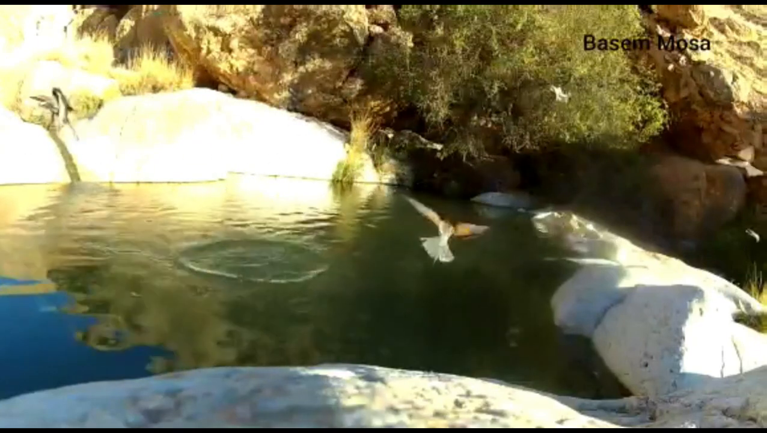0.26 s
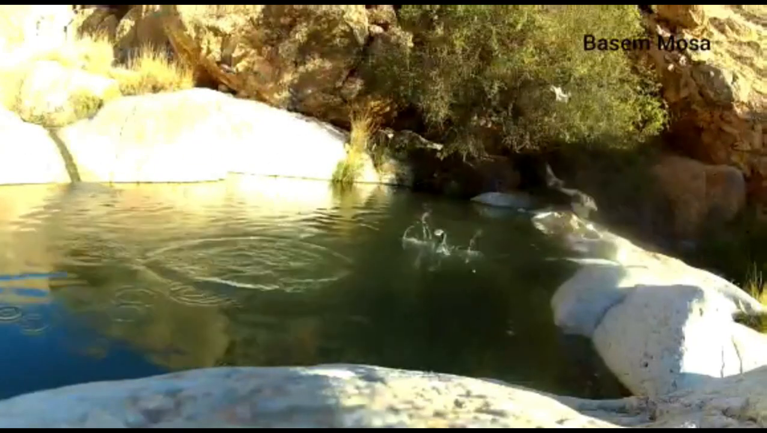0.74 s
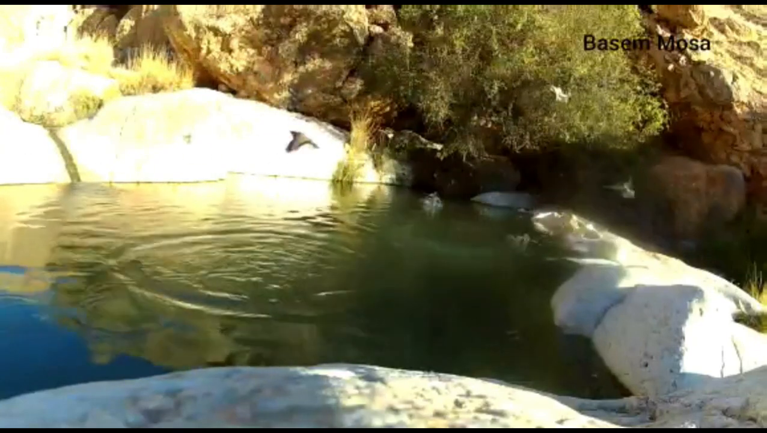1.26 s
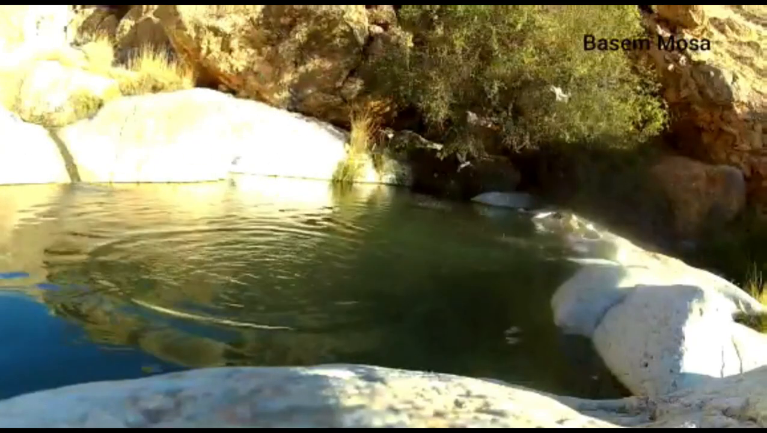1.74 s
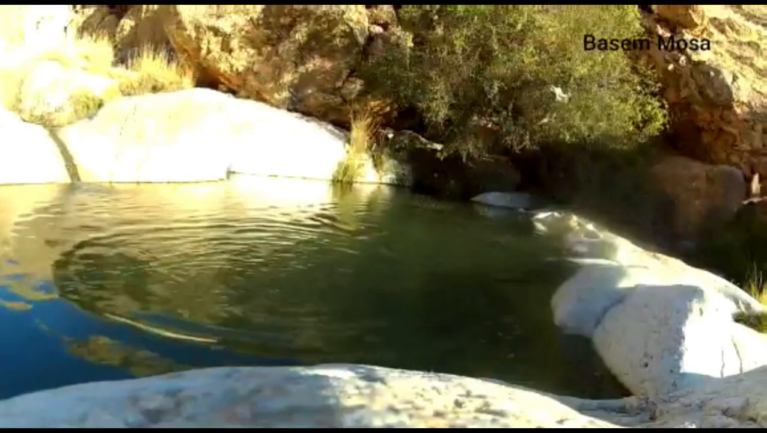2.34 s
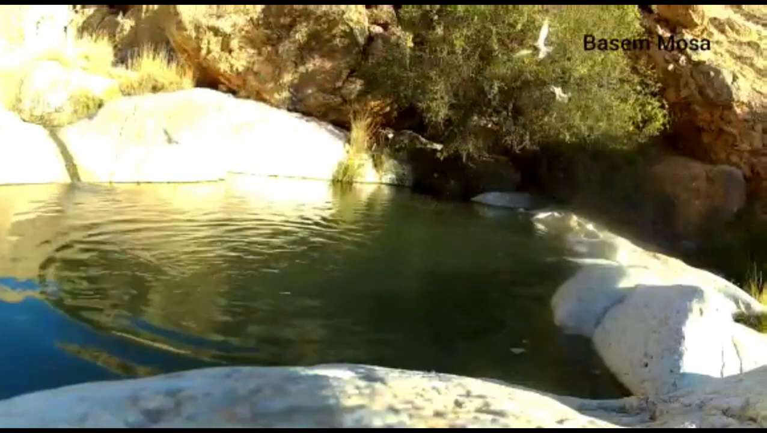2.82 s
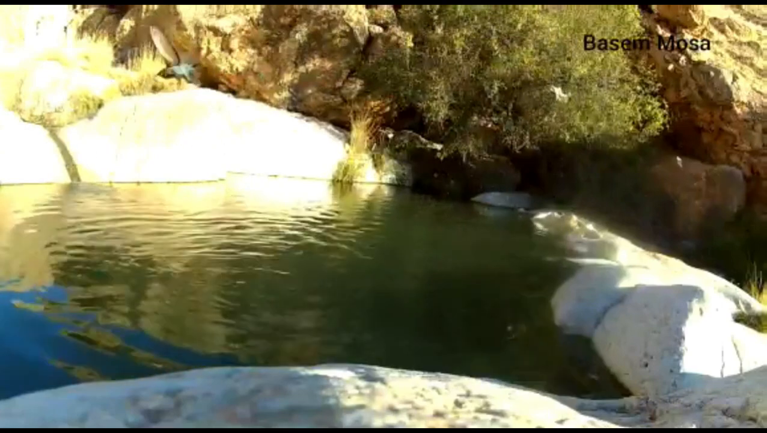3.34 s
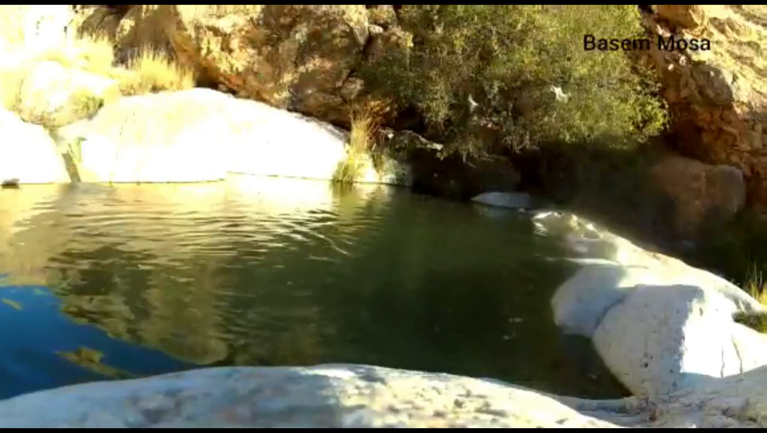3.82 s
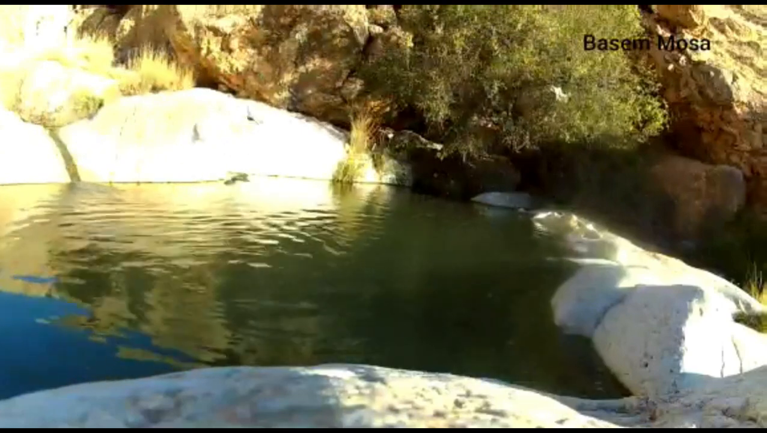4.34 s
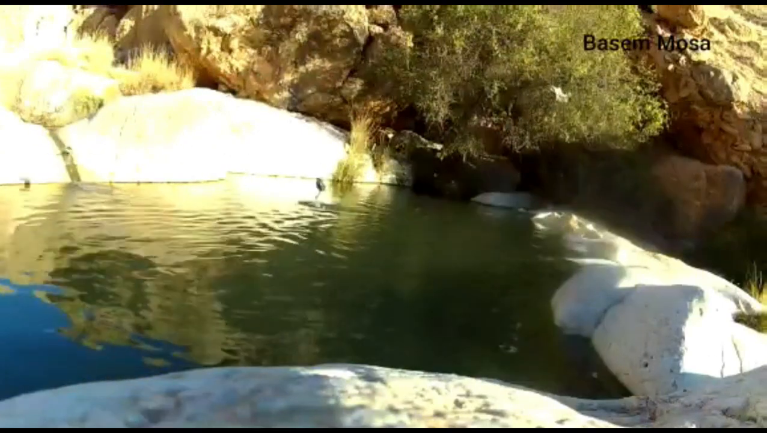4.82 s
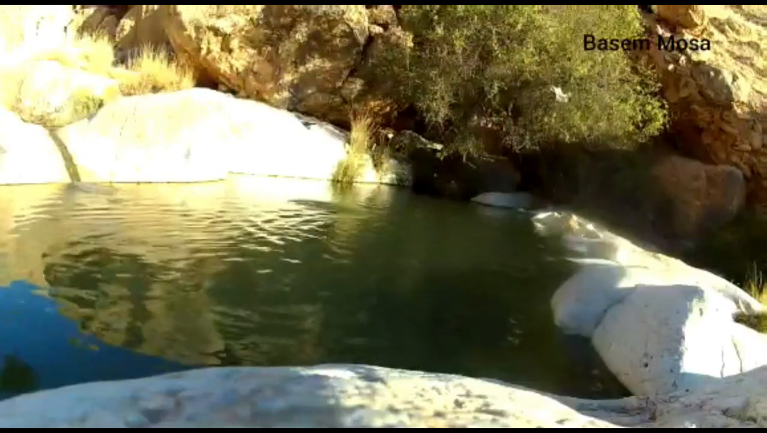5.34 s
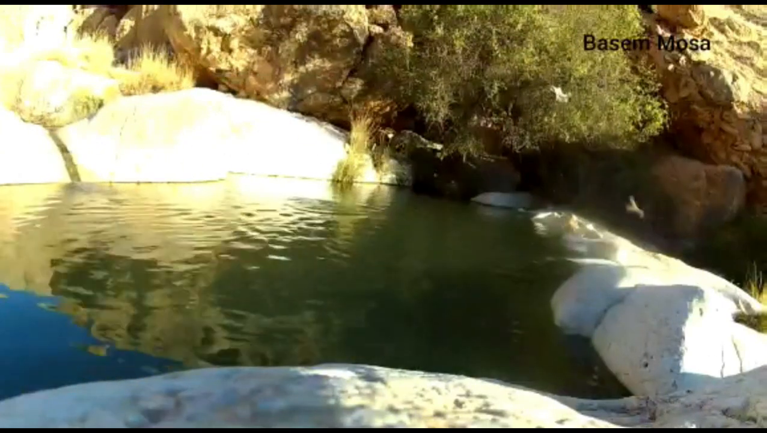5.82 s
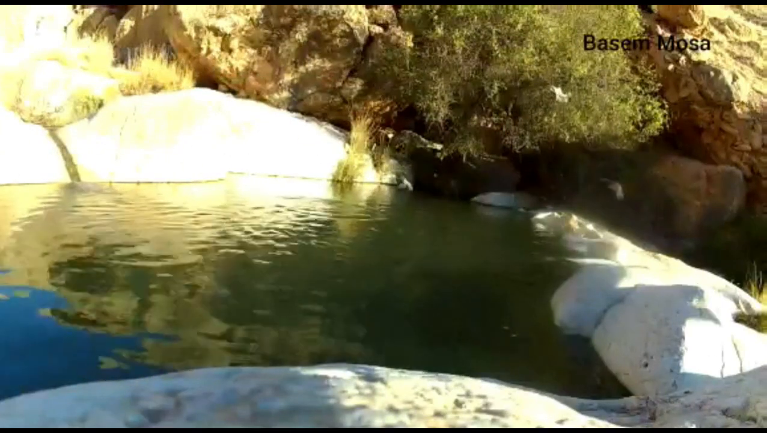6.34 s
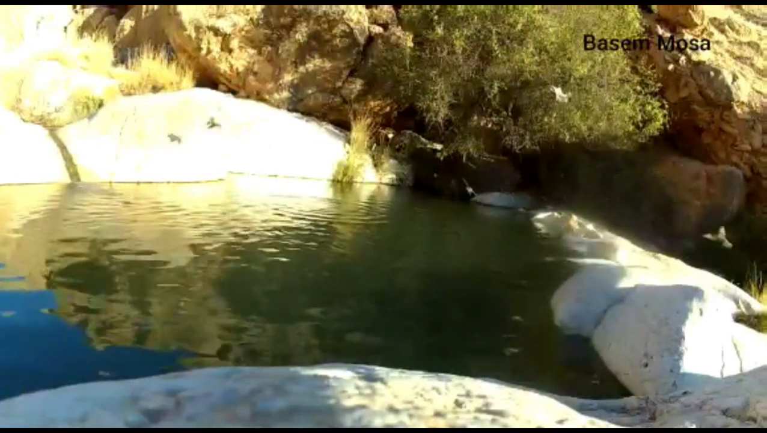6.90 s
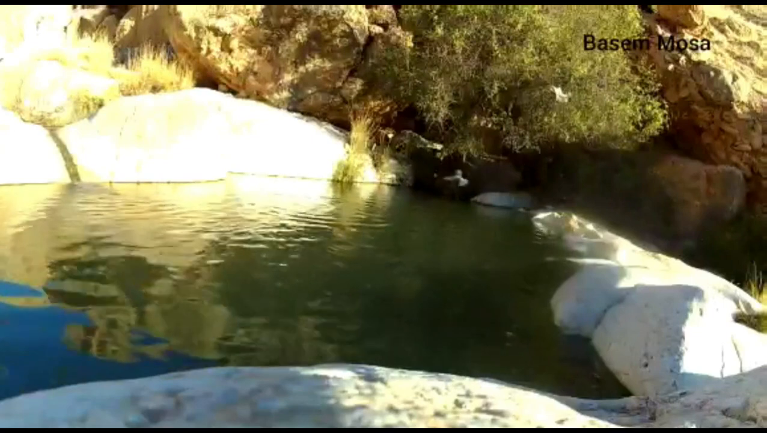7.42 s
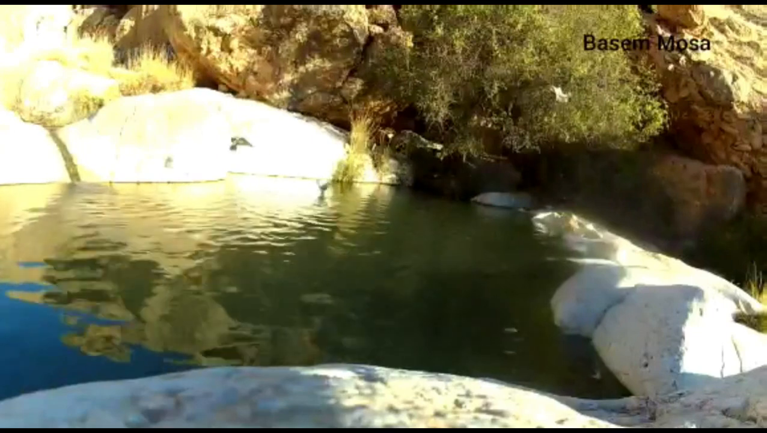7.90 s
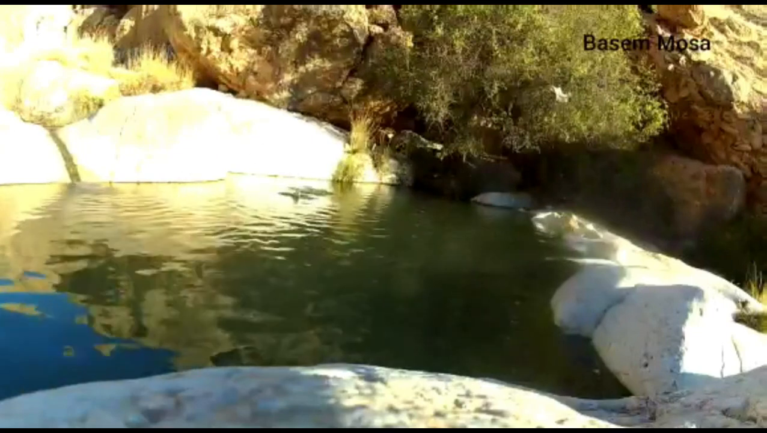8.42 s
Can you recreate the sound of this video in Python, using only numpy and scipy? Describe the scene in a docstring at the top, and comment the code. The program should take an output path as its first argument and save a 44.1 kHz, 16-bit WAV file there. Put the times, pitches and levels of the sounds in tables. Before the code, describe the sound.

Outdoors at a rock-walled pool, a steady hiss and low restless rumble run throughout. Small water plops and sharp clicky drips come early, then two quick rolling bird whistles, and another a second later. Faint trills follow from farther off, with scattered bubbles. A sudden, very close, loud rolling whistle stands out past the middle, then a short chip and distant trills. Mono, with rocky echoes and slightly dull top end.

```python
"""Bee-eaters over a rock pool

Bee-eaters dip into the pool and call in flight: rolling whistles (gliding tones with overtones), one of
them very near, a short chip, and far trills whose pitch beats evenly. The rock walls answer each call with
scattered noise. Spray is a patter of filtered clicks, plops and lapping are short ringing bubbles, and
filtered noise makes the low rumble and the steady hiss of air under it all."""
import sys
import numpy as np
from scipy import signal
from scipy.fft import rfft, irfft, next_fast_len
from scipy.io import wavfile
from scipy.ndimage import uniform_filter1d, map_coordinates

SR = 44100
rng = np.random.default_rng(int(sys.argv[2]) if len(sys.argv) > 2 else 0)


def materialize(psi):
    """Save the field psi as 16-bit PCM at rate SR to the path in sys.argv[1].

    A 1-D psi becomes a single channel; in a 2-D psi each row is a channel.
    """
    bounded = np.clip(np.atleast_2d(psi).T, -1, 1)
    quanta = np.round(bounded * 32767).astype(np.int16)
    wavfile.write(sys.argv[1], SR, quanta)


N = 381906
T = np.arange(N) / SR


def amp(db):
    """Decibels to gain."""
    return 10 ** (np.asarray(db) / 20)


def unit(x):
    """Scale to rms 1."""
    return x / np.sqrt(np.mean(x ** 2) + 1e-20)


def along(points, hz):
    """Read (Hz, value) points on a log axis."""
    f, v = np.transpose(points)
    return np.interp(np.log(hz + 1), np.log(f + 1), v)


def curves(rows, at):
    """Each column after the first, read at the given places."""
    s, *cols = np.transpose(rows)
    return [np.interp(at, s, c) for c in cols]


def wobble(rate, size):
    """A smooth random curve, rate knots a second."""
    knots = rng.standard_normal(int(size * rate / SR) + 4)
    return map_coordinates(knots, [np.arange(size) * rate / SR])


def filtered(x, response):
    """x times a gain that depends on frequency."""
    m = next_fast_len(N + SR // 2)
    return irfft(rfft(x, m) * response(np.fft.rfftfreq(m, 1 / SR)), m)[:N]


def phase_of(hz):
    """Running phase of a gliding tone."""
    return 2 * np.pi * np.cumsum(hz) / SR


def add(track, s, sound):
    """Mix a sound into the track at time s."""
    part = track[round(s * SR):][:len(sound)]
    part += sound[:len(part)]


def patchy_noise(patchy_db):
    """White noise whose strength drifts in small patches of time and frequency."""
    z = signal.stft(rng.standard_normal(N), nperseg=512)[2]
    field = uniform_filter1d(rng.standard_normal(z.shape), size=7, axis=0)
    field = uniform_filter1d(field, size=9, axis=1)
    return signal.istft(z * amp(patchy_db * unit(field)), nperseg=512)[1][:N]


def rocks(sound, echo_db, gap_s=0.0041, near_t60_s=0.27, far_t60_s=0.67, far_db=-17):
    """The direct sound, then dense scatter from the near rocks and a longer tail from the gorge."""
    # what the rocks send back: hz, gain_db
    echo_colour = [(1400, 4), (2000, 5.5), (2400, 8.5), (2700, 11.5), (3200, 3), (6000, -9.5),
                   (12000, -11.5)]
    t = np.arange(SR // 2) / SR
    near = amp(-60 * t / near_t60_s)
    far = amp(far_db - 60 * t / far_t60_s)
    decay = (t > gap_s) * (near + far)
    colour = amp(along(echo_colour, np.fft.rfftfreq(len(t), 1 / SR)))
    scatter = irfft(rfft(rng.standard_normal(len(t))) * colour, len(t))
    echo = signal.fftconvolve(sound, decay * scatter)
    # echo_db compares the energy of the whole echo with that of the direct sound
    echo *= amp(echo_db) * np.linalg.norm(sound) / np.linalg.norm(echo)
    add(echo, 0, sound)
    return echo


def air(split_hz=700, flutter_db=1.03, rumble_gain_db=4, hiss_db=-45, hiss_waver_db=0.4):
    """A low restless rumble, an even hiss and a few faint steady tones."""
    # spectrum of the air, before each half is scaled to rms 1: hz, relative_db_per_hz
    air_colour = [(12, -29.5), (20, -1.5), (65, 0.5), (116, -2.5), (220, -2), (430, -4.5), (568, -3.5),
                  (817, -5.5), (1110, -2.5), (1590, -7), (1830, -5), (3390, -17), (4000, -18), (6080, -24),
                  (15700, -30)]
    # bands where the hiss is a little stronger: middle_hz, width_hz, boost_db
    hiss_bands = [(4050, 160, 2), (11100, 450, 2), (13620, 170, 4), (15400, 500, 3.5)]
    # course of the rumble, before rumble_gain_db: time_s, level_db
    breeze = [(0.0, -52), (0.29, -50.5), (1.61, -51), (4.36, -53.5), (5.57, -51.5), (5.76, -53),
              (6.42, -51.5), (6.75, -53.5), (7.04, -52.5), (7.96, -53), (8.22, -52.5), (8.66, -50.5)]
    # faint steady tones: pitch_hz, level_db
    whine = [(60, -66), (10020, -81)]

    def colour(hz):
        boost = sum(db * np.exp(-((hz - middle) / width) ** 2) for middle, width, db in hiss_bands)
        return amp(along(air_colour, hz) + boost)

    rumble = unit(filtered(rng.standard_normal(N), lambda hz: colour(hz) * (hz < split_hz)))
    hiss = unit(filtered(patchy_noise(patchy_db=1.57), lambda hz: colour(hz) * (hz >= split_hz)))
    tones = np.zeros(N)
    for hz, db in whine:
        tones += amp(db) * np.sqrt(2) * np.sin(2 * np.pi * hz * T + 0.5 * wobble(4.1, N))
    rumble_db = curves(breeze, T)[0] + rumble_gain_db + flutter_db * wobble(14, N)
    hiss_course_db = hiss_db + hiss_waver_db * wobble(10, N)
    return amp(rumble_db) * rumble + amp(hiss_course_db) * hiss + tones


def lapping(count=320, middle_hz=290, spread=0.32, cycles=4, scatter_db=4):
    """Ripples from the dips gurgle against the rocks: low bubbles of a few cycles each."""
    # strength of the lapping: time_s, level_db
    lapping_level = [(0, -54), (.8, -53.5), (1.9, -49), (2.6, -62.5), (5.3, -54), (8.1, -68), (8.4, -47),
                     (8.66, -60)]
    out = np.zeros(N)
    starts = (np.arange(count) + rng.random(count)) / count  # as a share of the scene
    for start, (pitch, size) in zip(starts, rng.standard_normal((count, 2))):
        hz = middle_hz * np.exp(spread * pitch)
        u = np.linspace(0, 1, int(cycles * SR / hz))
        swell = np.sin(np.pi * np.sqrt(u)) ** 2  # quick to rise, slower to fade
        bubble = swell * np.sin(2 * np.pi * cycles * u)
        add(out, start * N / SR, amp(scatter_db * np.tanh(size)) * bubble)
    return amp(curves(lapping_level, T)[0]) * unit(out)


def spray(drops_per_s=350):
    """After a bird's dip, fine drops shower back on the pool: sparse random clicks, coloured."""
    # falling spray: middle_s, spread_s, level_db at its height
    sprays = [(.83, 0.086, -57), (1.6, 0.31, -60), (4.9, 0.091, -60), (5.66, 0.05424, -62)]
    # tone of the patter, before it is scaled to rms 1: hz, relative_db
    spray_colour = [(1500, -18), (3800, 1), (5200, 7), (6400, -2), (8000, 3), (9700, -10), (11300, 2.5),
                    (14000, -14)]
    drops = (rng.random(N) < drops_per_s / SR) * rng.standard_normal(N)
    patter = unit(filtered(drops, lambda hz: amp(along(spray_colour, hz))))
    shower = sum(amp(db) * np.exp(-((T - s) / spread) ** 2 / 2) for s, spread, db in sprays)
    return shower * patter


def plops(rise=0.047, unsteady=0.053):
    """Each bubble rings briefly and tends to rise in pitch as it nears the surface."""
    # plops and drips: start_s, length_s, pitch_hz at the middle, peak_db
    plop_list = [(0.166, 0.013, 1064, -35.5), (.720, .005, 3380, -39), (.770, 0.0022, 8200, -40),
                 (1.055, .005, 6700, -49), (1.385, .003, 2380, -32), (1.485, 0.0038, 3650, -39),
                 (1.532, .014, 5000, -47), (1.587, 0.0072, 3120, -39), (3.687, 0.032, 1028, -38.5),
                 (3.925, 0.04, 806, -41), (4.01, 0.063, 583, -35.5), (4.929, 0.011, 1919, -36),
                 (6.203, 0.033, 950, -40), (6.376, .004, 8200, -46), (6.572, 0.024, 626, -40),
                 (6.694, 0.011, 1310, -35.5), (7.624, .003, 8300, -44)]
    out = np.zeros(N)
    for s, length, hz, db in plop_list:
        u = np.linspace(0, 1, int(length * SR))
        pitch = hz * (1 + rise * (u - 0.5) + unsteady * wobble(280, len(u)))
        ring = np.sin(np.pi * u) * np.sin(phase_of(pitch))
        add(out, s, rocks(amp(db) * ring, echo_db=-15))
    return out


def far_trills(flicks_per_s=46, fall=0.0417, unsteady=0.0261):
    """Distant birds flick their pitch up at an even beat, sinking a little, with a longer echo."""
    # trills: start_s, length_s, pitch_hz, level_db, swing as a share of the pitch,
    # octave_db under the fundamental, echo_db against the direct sound
    trills = [(3.678, 0.09, 2106, -47.5, 0.042, -25, -6), (4.747, .08, 2455, -46.5, 0.097, -25, -2),
              (5.172, 0.07, 2496, -45, .10, -25, 0), (6.597, 0.055, 2170, -48.5, 0.094, -4, -2),
              (7.862, .13, 2080, -50.5, .08, -25, 0), (8.013, 0.13, 2150, -50.5, 0.083, -25, -2)]
    out = np.zeros(N)
    for s, length, hz, db, swing, octave_db, echo_db in trills:
        t = np.arange(int(length * SR)) / SR
        flicks = 2 * np.sin(np.pi * flicks_per_s * t + np.pi / 4) ** 4 - 1
        sinking = fall * (t / length - 0.5)
        pitch = hz * (1 + swing * flicks - sinking + unsteady * wobble(414, len(t)))
        phase = phase_of(pitch)
        voice = np.sin(phase) + amp(octave_db) * np.sin(2 * phase)
        trill = amp(db) * np.sqrt(2) * signal.windows.tukey(len(t), 0.2) * voice
        add(out, s, rocks(trill, echo_db, far_t60_s=1.0, far_db=16))
    return out


def chip(start_s=6.348, length_s=0.0294, top_s=0.019, level_db=-27, fade_db=12, octave_db=-13):
    """A quick rising note with a strong octave, loudest at its top, sagging at the end."""
    out = np.zeros(N)
    # time_s, pitch_hz, level_db against the top
    arch = [(0, 1214, -fade_db), (top_s, 2146, 0), (length_s, 1850, -fade_db)]
    hz, db = curves(arch, np.arange(int(length_s * SR)) / SR)
    phase = phase_of(hz)
    voice = np.sin(phase) + amp(octave_db) * np.sin(2 * phase)
    add(out, start_s, rocks(amp(level_db + db) * voice, echo_db=-15))
    return out


def roll(s, length, pitch, climb_hz_per_s, settle_hz, swell_db):
    """A scoop, a climbing, swelling note, flicks and a closing slur: gives pitch, gain, flick depth."""
    # upward flicks of the voice: middle_s in the scene, length_s, rise_hz
    flick_list = [(1.435, .007, 900), (1.445, .006, 480), (1.455, .005, 340), (1.466, .005, 300),
                  (1.611, .011, 700), (1.649, .012, 560), (1.684, .006, 450), (2.521, .007, 760),
                  (2.531, .011, 780), (2.559, .008, 530), (2.586, .005, 530), (4.337, .008, 620),
                  (4.357, .009, 620), (5.788, .007, 690), (5.7975, .010, 650), (5.8265, .008, 590),
                  (5.854, .007, 520)]
    scoop_hz, scoop_s = 560, 0.00295  # the call slides up into its note
    crest_hz, opening_db = 101, -3.5  # the climb ends this far over the pitch; the swell starts here
    up_s, down_s = 0.0028, 0.004  # the voice jumps up faster than it comes back
    settle_s = 0.012  # what is left of a flick's pitch dies away this fast
    full_flick_hz = 555  # the rise that brings a call's full dip in level
    drop_hz, drop_s = 993, 0.02  # the closing downward slur
    attack_s, release_s = 0.0072, 0.023
    t = np.arange(int(length * SR)) / SR

    def step(at, span):
        return 0.5 + 0.5 * np.tanh(2 * (t - at) / span)

    flicks = [(at - s - width / 2, at - s + width / 2, rise)
              for at, width, rise in flick_list if s < at < s + length]
    opening_s = flicks[0][0]  # the opening note lasts until the first flick
    opening = 1 - step(opening_s, down_s)
    climb = opening * (crest_hz - climb_hz_per_s * (opening_s - t))
    lift = sum(rise * step(up, up_s) * (1 - step(down, down_s)) for up, down, rise in flicks)
    leftovers = [step(up, up_s) * np.exp(-np.maximum(t - down, 0) / settle_s) for up, down, _ in flicks]
    settle = settle_hz * np.max(leftovers, axis=0)
    scoop = scoop_hz * np.exp(-t / scoop_s)
    slur = drop_hz * np.clip(1 - (length - t) / drop_s, 0, 1)
    hz = pitch - scoop + climb + np.maximum(lift, settle) - slur
    swell = amp(opening * np.interp(t, [0, opening_s], [opening_db, swell_db]))
    attack = np.minimum(t / attack_s, 1)
    release = np.minimum((length - t) / release_s, 1) ** 2
    return hz, swell * attack * release, lift / full_flick_hz


def rolling_calls(jitter=0.009, rasp_db=-49, overtone_dip=0.23):
    """A whistle near 2 kHz flicks up, off the throat's resonance, weakening each time, then drops."""
    # calls: start_s, length_s, pitch_hz, climb_hz_per_s of the opening note, settle_hz left after a flick,
    # level_db, swell_db of the opening note, dip_db on a full flick, octave_db, bright_db of the overtones,
    # echo_db against the direct sound
    rolls = [(1.403, .104, 1872, 8000, 170, -32.5, -1, -6, -27, -8, -2.5),
             (1.558, 0.17, 1963, 2600, 226, -26, 2.5, -7, -34, -9, -9),
             (2.474, .133, 1936, 3800, 33, -27, 1.5, -4, -29, -17, -6.5),
             (4.289, 0.14, 1870, 5000, 155, -44.5, 5, -1, -26, -10.5, -7),
             (5.735, 0.14, 1922, 3340, 8.3, -13, 7.5, -9.5, -48, 1.5, -20.5)]
    # overtones through throat and bill, before bright_db: hz, gain_db
    throat = [(4200, -64), (4800, -41), (5300, -28), (5600, -37.5), (6300, -38), (7400, -64), (8300, -56),
              (9200, -46), (10000, -48), (11500, -54), (14000, -55), (15500, -47)]
    out = np.zeros(N)
    for (s, length, pitch, climb_hz_per_s, settle_hz, db, swell_db,
         dip_db, octave_db, bright_db, echo_db) in rolls:
        hz, gain, flick = roll(s, length, pitch, climb_hz_per_s, settle_hz, swell_db)
        phase = phase_of(hz * (1 + jitter * wobble(627, len(hz))))
        whistle = amp(dip_db * flick) * (np.sin(phase) + amp(octave_db) * np.sin(2 * phase))
        overtones = np.zeros(len(hz))
        for k in range(2, 9):
            audible = k * hz < SR / 2
            overtones += amp(along(throat, k * hz)) * audible * np.sin(k * phase)
        rasp = amp(rasp_db) * rng.standard_normal(len(hz))
        # a bird farther off or turned away sends less of its overtones;
        # they take only a share (overtone_dip) of a flick's dip
        edge = amp(bright_db + overtone_dip * dip_db * flick) * (overtones + rasp)
        call = np.sqrt(2) * amp(db) * gain * (whistle + edge)
        add(out, s, rocks(call, echo_db))
    return out


def scene():
    """Air, water and birds, in mono."""
    background = air() + lapping() + spray() + plops()
    birds = far_trills() + chip() + rolling_calls()
    return (background + birds)[None]


def record(dry, top_hz=15800):
    """The recorder keeps nothing above its band limit."""
    return np.array([filtered(channel, lambda hz: hz < top_hz) for channel in dry])


dry = scene()
out = record(dry)
materialize(out)
```